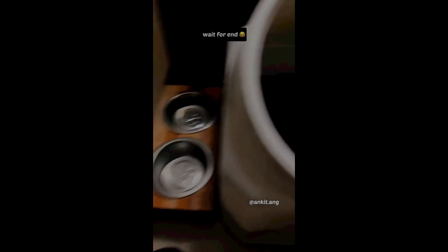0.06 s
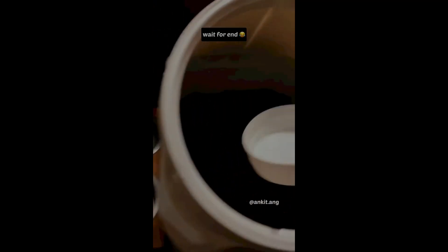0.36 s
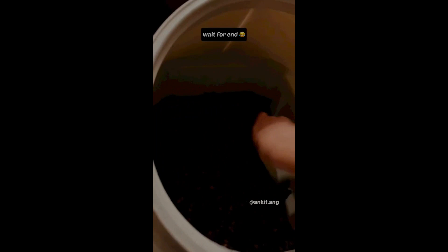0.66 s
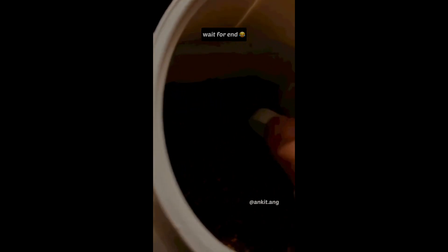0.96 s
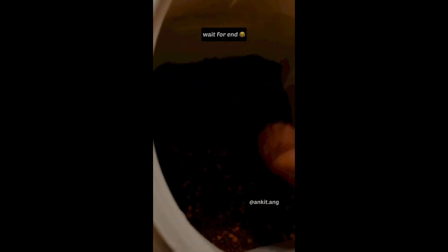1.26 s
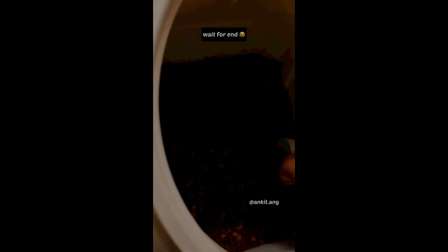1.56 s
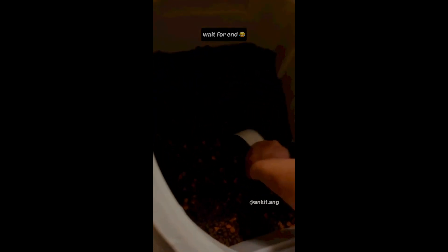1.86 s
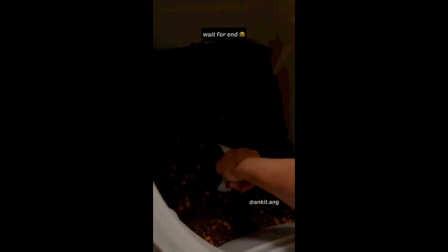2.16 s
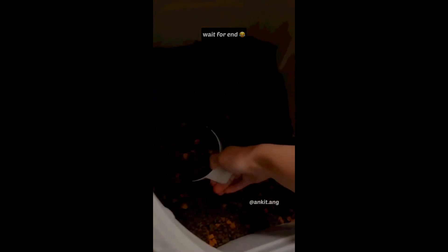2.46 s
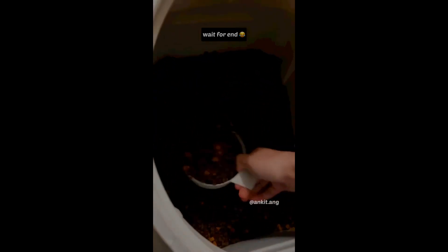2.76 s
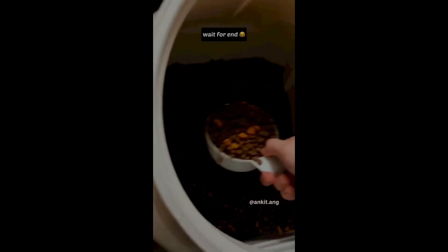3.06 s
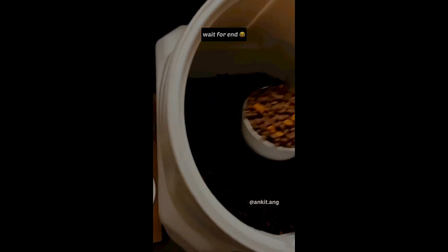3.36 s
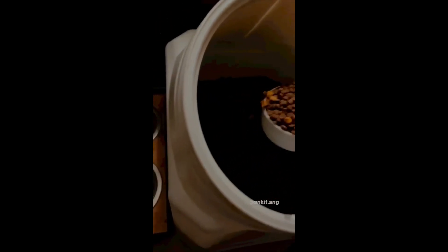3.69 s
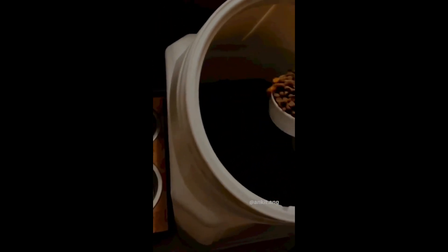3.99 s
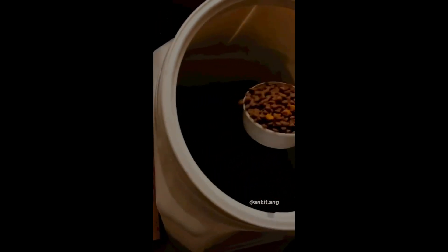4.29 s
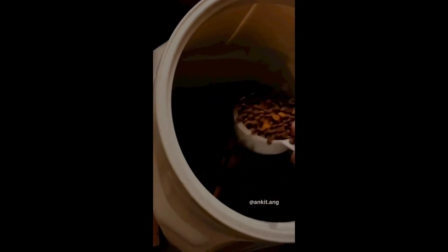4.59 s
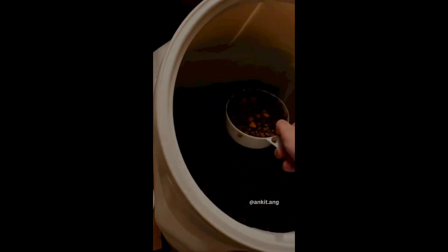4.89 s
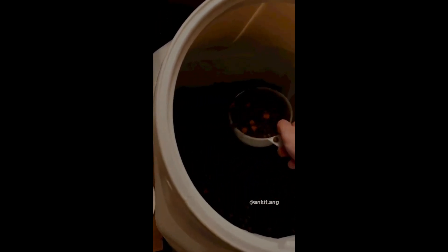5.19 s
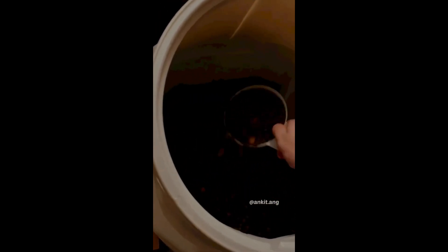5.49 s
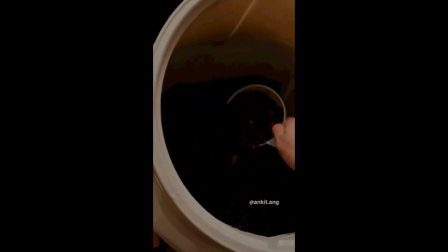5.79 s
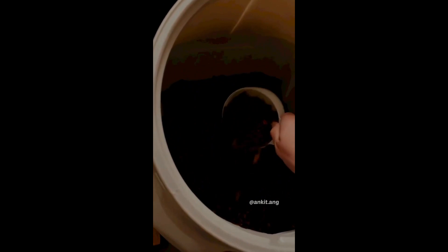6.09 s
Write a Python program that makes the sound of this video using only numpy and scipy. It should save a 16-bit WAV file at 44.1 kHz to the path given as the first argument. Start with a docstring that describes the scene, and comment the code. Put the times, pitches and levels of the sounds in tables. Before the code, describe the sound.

Close by in a quiet room, dry pet food pellets crackle and grind as a cup is shoved into a big plastic storage bin, which thumps and resonates hollowly. After about two seconds the digging eases into a few light ticks. The raised cup is then shaken, and pellets trickle back onto the heap in uneven bursts, with crisp clicks and a hollow patter on plastic.

```python
"""Scooping dry pet food

A plastic cup digs through dry pet food in a big plastic bin, then is lifted and shaken so that
pellets spill back. Thousands of tiny contacts give a crisp crackle (pellet on pellet) and a hollow
patter (pellet on plastic). The air in the bin colours and echoes them, and its walls boom as the
cup pushes through the heap."""
import sys
import numpy as np
from scipy import signal
from scipy.io import wavfile
from scipy.ndimage import uniform_filter1d

SR = 44100
rng = np.random.default_rng(int(sys.argv[2]) if len(sys.argv) > 2 else 0)


def wrap_up_sound(samples):
    """Save the sound to the file named by the first command line argument, as 16-bit audio."""
    columns = np.atleast_2d(samples).T
    # keep every value between -1 and 1, then stretch to whole-number steps
    tamed = np.clip(columns, -1, 1)
    steps = np.round(tamed * 32767).astype(np.int16)
    wavfile.write(sys.argv[1], SR, steps)


N = 270758
TIME = np.arange(N) / SR


def from_db(db):
    """Turns decibels into a gain to multiply by."""
    return 10 ** (np.asarray(db) / 20)


def unit(x):
    """Scales a sound to an average power of 1."""
    return x / np.sqrt(np.mean(x ** 2) + 1e-20)


def steady(x, seconds):
    """Evens out swells slower than the given time, keeping the fine grain."""
    power = abs(uniform_filter1d(x ** 2, max(int(seconds * SR), 8)))
    return x / np.sqrt(power + 1e-9)


def curves(table):
    """Joins a table's rows with straight lines: one curve for each column after the time."""
    times, *columns = np.transpose(table)
    return np.array([np.interp(TIME, times, column) for column in columns])


def gain_curves(table, onset_s=0.21):
    """Turns a table of dB levels into gains that fade in just before its first time."""
    fade_in = np.clip((TIME - table[0][0]) / onset_s + 1, 0, 1)
    return from_db(curves(table)) * fade_in


def add(mix, start, sound):
    """Adds a sound into the mix at a start time in seconds."""
    part = mix[..., max(round(start * SR), 0):][..., :sound.shape[-1]]
    part += sound[..., :part.shape[-1]]


def colour(x, spectrum, peaks=(), size=8192):
    """Filters a sound as if it rang through an object with this spectrum and these resonances."""
    hz = np.abs(np.fft.fftfreq(size, 1 / SR))
    points_hz, points_db = np.transpose(spectrum)
    db = np.interp(np.log(hz + 1), np.log(points_hz), points_db)
    octaves_outside = np.log2(np.maximum(hz / points_hz[-1], 1) * np.maximum(points_hz[0] / (hz + 5), 1))
    db -= 30 * octaves_outside
    db += sum(boost / (1 + (2 * (hz - centre) / width) ** 2) for centre, width, boost in peaks)
    log_gain = np.log(from_db(np.maximum(db, -90)))
    response = np.exp(np.conj(signal.hilbert(log_gain)))  # rings after a hit, never before it
    ring = np.fft.ifft(response).real[:size // 2]
    return signal.oaconvolve(x, ring / np.linalg.norm(ring))[:N]


def low_pass(x, hz):
    """Cuts steeply above the given frequency."""
    taps = signal.firwin(511, hz, window=("kaiser", 8), fs=SR)
    return signal.oaconvolve(x, taps[None], "same")


def bumps(per_s, spread_db):
    """Tiny kicks of uneven size at random times."""
    sizes = from_db(spread_db * np.minimum(rng.exponential(1, N), 4))
    return sizes * (rng.random(N) < per_s / SR)


def contacts(per_s, spread_db, ring_s, count=40000, size=200):
    """Pellets touch at random, some harder than others; each rings briefly at two pitches of its own."""
    when, chance, force, decay, *pitches = rng.random((count, 6)).T
    at = (when * N).astype(int)
    sounding = chance < (per_s * np.ones(N))[at] * N / SR / count
    strength = np.minimum(-np.log(1 - force), 4)
    gain = from_db((spread_db * np.ones(N))[at] * strength)[sounding, None]
    t = TIME[:size]
    ring = sum(np.cos(2 * np.pi * (pitch[sounding, None] * SR / 4) * t) for pitch in pitches)
    ring *= gain * np.exp(-t / (ring_s * (.5 + decay[sounding, None])))
    samples = at[sounding, None] + np.arange(size)
    return np.bincount(samples.ravel(), ring.ravel(), N + size)[:N]  # adds up all the rings


# The tone of the room. Each row: frequency in Hz, relative level in dB.
ROOM_SPECTRUM = [(25, -17), (70, 8.5), (150, -6), (300, -16), (1000, -29), (4000, -23.5), (9600, -35.5)]

def room_tone():
    """A faint, steady rumble and hiss lies behind everything."""
    return from_db(-50.5) * colour(rng.standard_normal(N), ROOM_SPECTRUM)


# Jolts of the cup against heap or bin. Each row: start in seconds, relative level in dB, pitch in Hz.
JOLTS = [(0.592, -13, 81.7), (0.765, -8, 126), (0.785, -6, 85), (0.924, -11, 79.4), (0.949, -12, 119),
         (1.36, -11, 104), (1.618, -5, 120), (1.755, -17, 113), (1.835, -11.5, 116.5), (2, -15.5, 148),
         (2.059, -10, 108), (2.158, -13, 91), (2.314, -18, 129), (2.488, -22, 77.4), (2.79, -22.5, 114),
         (2.877, -22.5, 130), (3.43, -26, 105), (3.693, -25.5, 121), (3.91, -22, 120), (4.049, -22, 112),
         (4.398, -23.5, 144), (4.611, -22, 126), (4.717, -21, 103), (5.038, -20, 126), (5.85, -17, 118)]

def thuds(rise_s=0.013, level_db=-4, overtone_ratio=2.56, overtone_db=-15):
    """Each jolt makes a wall of the bin swing: a low note with a shorter overtone."""
    out, t = np.zeros(N), TIME[:6000]
    swell = t / rise_s * np.exp(1 - t / rise_s)
    for start, db, hz in JOLTS:
        angle = 2 * np.pi * hz * t
        overtone = from_db(overtone_db) * swell ** 2 * np.sin(overtone_ratio * angle)
        add(out, start, from_db(db + level_db) * (swell * np.sin(angle) + overtone))
    return out


# Shoves that set the heap grinding: a bump, then the cup landing, digging and drawing out.
# Each row: start, rise and hold in seconds, the pellets' fade in dB per second,
# then relative levels in dB for crackle, patter, wall boom and air drone.
SHOVES = [(0.0, 0.0027, 0.0025, 346, -41.5, -44, -40, -38),
          (0.558, 0.036, 0.0078, 182, -24.5, -26, -20.5, -30),
          (0.651, 0.14, 0.16, 56, -15.5, -17, -15.5, -19.5), (1.252, 0.15, 0.21, 138, -15, -17, -20, -26.5),
          (1.641, 0.024, 0.18, 102, -34.5, -36.5, -19, -29), (1.935, 0.056, .115, 105, -24, -28, -16, -38),
          (2.127, 0.039, 0.069, 115, -24, -25, -26, -33.5), (2.34, 0.014, 0.14, 60, -32.5, -37, -33.5, -39)]

def shoves(wall_fade_share=0.64, air_fade_share=0.8):
    """Gains for crackle, patter, boom and drone as shoves build and fade; walls and air settle last."""
    power = np.zeros((4, N))
    share = np.array([[1], [1], [wall_fade_share], [air_fade_share]])
    t = TIME[:2 * SR]
    for start, rise, hold, fade, *db in SHOVES:
        faded_db = share * fade * np.maximum(t - rise - hold, 0)
        gain = np.minimum(t / rise, 1) * from_db(np.array(db)[:, None] - faded_db)
        add(power, start, gain ** 2)
    return np.sqrt(power)


# The tone of the walls (cup buried, cup raised) and of the air in the bin.
# Each row: frequency in Hz, relative level in dB.
BOOM_BURIED = [(20, -23.5), (42, -27), (62, -1), (80, 0.5), (98, -1), (120, 0.5), (150, -4.5), (185, -10.5),
               (260, -31), (500, -62)]
BOOM_RAISED = [(20, -46), (42, -25), (62, -5), (80, 3.5), (110, 3.5), (145, 4.5), (190, -16), (260, -20.5),
               (500, -30)]
AIR_DRONE = [(130, -19), (220, 2), (300, 1.5), (355, -2), (425, 4), (520, -8), (650, -9), (1000, -28.5)]
# Rumble while the cup is held up. Each row: time in seconds, relative boom and drone levels in dB.
HANDLING = [(2.55, -35.5, -44), (3.17, -42, -50), (3.31, -49, -64), (3.43, -34, -44.5),
            (3.85, -42.5, -52.5), (3.92, -31.5, -42.5), (4.34, -36, -43), (4.42, -30.5, -36.5),
            (4.98, -43, -48), (5.01, -37, -41.5), (6.12, -31.5, -34.5), (6.14, -34, -38)]

def bin_rumble(lift, push, boom_db=0.5, drone_db=-1.5, jolt_db=-19, jolt_s=0.0081):
    """Shoves and handling make the bin's walls boom and its air drone; jolts stir the air too."""
    handling = gain_curves(HANDLING) * from_db([[boom_db], [drone_db]])
    boom_gain, drone_gain = np.hypot(push, handling)  # hypot adds two levels by their power
    jolts, t = np.zeros(N), TIME[:SR // 4]
    for start, db, _ in JOLTS:
        add(jolts, start, from_db(db + jolt_db) * t / jolt_s * np.exp(1 - t / jolt_s))
    wall_kicks = bumps(300, spread_db=0.5) * rng.standard_normal(N)
    boom = colour(wall_kicks * (1 - lift), BOOM_BURIED) + colour(wall_kicks * lift, BOOM_RAISED)
    air_kicks = bumps(600, spread_db=0.5) * rng.standard_normal(N)
    drone = steady(colour(air_kicks, AIR_DRONE), seconds=0.056)
    return boom_gain * steady(boom, seconds=.05) + np.hypot(drone_gain, jolts) * drone


# Scrapes and squeaks on the plastic, two short knocks, and a faint opening rustle.
# Each row: start and length in seconds, pitch and resonance width in Hz, level in dB.
SCRAPES_AND_KNOCKS = [(0.204, 0.23, 2700, 1500, -64), (0.909, .055, 427, 40, -20),
                      (1.07, 0.31, 2450, 348, -47), (1.183, 0.0087, 1410, 710, -20.5),
                      (1.288, 0.019, 6200, 810, -26), (1.676, 0.16, 856, 129, -34),
                      (1.941, 0.17, 5640, 990, -30), (1.967, 0.07, 884, 180, -31.5),
                      (2.861, 0.0092, 5580, 220, -37), (2.955, 0.0079, 5600, 251, -40),
                      (3.18, 0.043, 6800, 1500, -44), (3.359, 0.02, 600, 900, -44),
                      (4.9, 0.016, 6700, 496, -27.5), (5.153, 0.022, 6360, 503, -28)]

def scrapes_and_knocks():
    """Each scrape, squeak, knock or rustle is a swell of noise ringing through one resonance."""
    out = np.zeros(N)
    for start, length, hz, width, db in SCRAPES_AND_KNOCKS:
        n = int(length * SR)
        pole = np.exp((2j * hz - width) * np.pi / SR)  # sets the pitch and how long it rings
        noise = rng.standard_normal(SR // 2)
        ring = signal.lfilter([1], np.poly([pole, pole]), noise)[-n:].real
        add(out, start, from_db(db) * unit(ring * signal.windows.tukey(n, .6)))
    return out


# The tone of the cup hitting the heap. Each row: frequency in Hz, relative level in dB.
STRIKE_SPECTRUM = [(300, -29), (850, -4), (1200, -21), (2500, -3), (3080, -21), (3700, 0), (4400, 0),
                   (4800, -5), (6000, 4), (6450, -5), (7100, 0), (8200, -8), (9600, -14)]

def cup_strike(crash_db=-14, tail_db=-15, tail_s=0.02, ring_db=-28, ring_hz=6020, ring_s=.14):
    """The cup's rim hits the heap: a packed burst of contacts, a short settling, and a faint ring."""
    start, rise_s, length_s, fall_s = .5702, .002, .0165, .002
    t = np.maximum(TIME - start, 0)
    after = np.maximum(t - length_s, 0)
    settling = np.maximum(np.exp(-after / fall_s), from_db(tail_db) * np.exp(-after / tail_s))
    shape = np.minimum(t / rise_s, 1) * settling
    grains = steady(contacts(6800, spread_db=4.0, ring_s=0.00046), seconds=0.0025)
    ring = from_db(ring_db - 60 * t / ring_s) * np.sin(2 * np.pi * ring_hz * t)
    return from_db(crash_db) * colour(grains * shape, STRIKE_SPECTRUM) + ring


# Single pellets that snap or drop.
# Each row: start in seconds, relative crackle and patter levels in dB, pitch in Hz.
SNAPS = [(0.009, -34, -32.5, 1200), (1.183, -15, -20, 1500), (2.346, -17, -26, 1530),
         (2.463, -26, -35, 5870), (2.474, -31, -27, 6600), (2.498, -26, -31, 4260),
         (2.545, -21.5, -32, 4470), (2.595, -23.5, -32, 5460), (2.719, -32.5, -40, 6470),
         (2.768, -31, -37, 5740), (2.775, -29.5, -40, 8400), (2.873, -35, -43, 5500),
         (2.91, -36, -45, 6100), (3.095, -30.5, -40, 7760), (3.168, -28, -32.5, 6000),
         (3.206, -30, -34, 6200), (3.223, -25, -37, 2200), (3.255, -21, -23, 6260),
         (3.305, -33, -34.5, 3100), (3.361, -27.5, -35, 8400), (3.401, -36, -61, 6100),
         (3.461, -32, -53, 8800), (3.657, -27.5, -33, 3780), (3.687, -28, -38, 5600),
         (3.717, -33, -32, 5900), (3.783, -27, -26, 6100), (3.843, -35, -43, 3300), (3.902, -26, -50, 7150),
         (3.943, -31, -54, 8350), (4.168, -16, -23, 6200), (4.222, -16.5, -19.5, 6350),
         (4.234, -14, -22, 3980), (4.395, -18.5, -25, 6060), (4.579, -19, -28, 7950),
         (4.688, -21, -30, 4500), (4.821, -23, -28, 4420), (5.004, -23, -42, 6000),
         (5.029, -19.5, -27, 6060), (5.145, -25, -24.5, 6200), (5.473, -30, -25, 2400),
         (5.852, -25, -22, 1790), (6.021, -19, -8.5, 1090)]

def snaps(rise_s=0.0013, fall_s=0.0018, level_db=5, tone_db=-3, width_hz=1100):
    """One pellet snaps and chatters for a moment against its neighbours, ringing at its own pitch."""
    out, t = np.zeros((2, N)), TIME[:900]
    shape = (1 - np.exp(-(t / rise_s) ** 2)) * np.exp(-np.maximum(t - rise_s, 0) / fall_s)
    for start, crackle_db, patter_db, hz in SNAPS:
        chatter = rng.standard_normal(len(t))
        pole = np.exp((2j * hz - width_hz) * np.pi / SR)
        ring = .5 * unit(signal.lfilter([1], [1, -pole], chatter).real)
        snap = steady(chatter + from_db(tone_db) * ring, seconds=0.0045)
        gains = from_db(np.array([[crackle_db], [patter_db]]) + level_db)
        add(out, start, gains * shape * snap)
    return out


# Clumps of pellets that slide or land together.
# Each row: start and length in seconds, relative crackle and patter levels in dB.
CLUMPS = [(0.243, 0.033, -48, -57), (0.466, 0.012, -44, -48), (0.691, 0.025, -24.5, -24),
          (0.897, 0.022, -14.5, -21), (1.118, 0.029, -31, -29), (1.368, 0.044, -15.5, -37),
          (2.376, .02, -29.5, -34), (2.633, 0.022, -41, -48), (2.794, 0.022, -44, -52),
          (2.972, 0.014, -44, -75), (3.215, 0.034, -36.5, -38), (3.533, 0.075, -32, -36.5),
          (3.729, 0.035, -37, -40), (3.894, 0.0091, -34, -61), (4.18, 0.044, -25, -32.5),
          (4.368, 0.032, -26.5, -35), (4.515, 0.048, -29.5, -36), (4.678, .025, -33, -42),
          (4.812, 0.065, -26.5, -34.5), (4.893, 0.039, -31.5, -44), (4.993, 0.04, -23.5, -33),
          (5.137, 0.046, -26.5, -38), (5.272, 0.094, -28.5, -31), (5.408, 0.047, -30.5, -25),
          (5.519, 0.043, -25.5, -23.5), (5.577, 0.077, -29.5, -22), (5.647, 0.026, -28, -15.5),
          (5.771, 0.033, -27, -15.5), (5.904, 0.018, -39, -17), (5.996, 0.074, -23, -19.5)]

def clumps(rise_s=0.0027, fall_s=0.01, level_db=-3):
    """A push or shake of the cup lets a tight shower of pellets go."""
    gains = np.zeros((2, N))
    for start, length, *db in CLUMPS:
        t = TIME[:int((length + .04) * SR)]
        shape = np.minimum(t / rise_s, 1) * np.exp(-np.maximum(t - length, 0) / fall_s)
        add(gains, start, from_db(np.add(db, level_db))[:, None] * shape)
    return gains * steady(contacts(2400, spread_db=1.0, ring_s=0.00083), seconds=0.027)


# Pellets trickling over the rim as the cup is lifted and tipped.
# Each row: time in seconds, relative crackle and patter levels in dB.
TRICKLE = [(2.65, -45, -57), (2.84, -62.5, -82), (2.99, -52.5, -53.5), (3.27, -57, -48.5),
           (3.53, -44, -54.5), (3.67, -49, -49), (4.03, -37.5, -44), (4.32, -27.5, -36.5),
           (4.43, -29.5, -33.5), (4.6, -37.5, -42.5), (4.76, -34, -43), (4.93, -34.5, -39),
           (5.26, -36, -35.5), (5.52, -28.5, -28), (5.71, -27.5, -28.5), (5.89, -25.5, -24),
           (6.04, -33, -32.5), (6.14, -23.5, -19.5)]

def trickle(dip_db=-7, jam_s=0.016):
    """The strength of the trickle; it falters just before each clump, while pellets wedge at the rim."""
    stuck = np.zeros(N)
    jam = signal.windows.tukey(int(jam_s * SR), .5)
    for start, *_ in CLUMPS:
        add(stuck, start - jam_s, jam)
    return gain_curves(TRICKLE) * from_db(dip_db * stuck)


def strays(flow, per_s=45, level_db=-1, rise_s=0.0013):
    """Lone pellets click out of the trickle at random."""
    t = TIME[:400]
    shape = t / rise_s * np.exp(1 - t / rise_s)
    clicks = signal.oaconvolve(bumps(per_s, spread_db=1.0), shape)[:N]
    return flow * from_db(level_db) * clicks * rng.standard_normal(N)


def stream(lift, grind, flow, dig_per_s=3600, spill_per_s=1900, grind_db=-3):
    """The heap grinds densely round the buried cup; loose pellets fall more sparsely."""
    per_s = dig_per_s + lift * (spill_per_s - dig_per_s)
    grains = steady(contacts(per_s, spread_db=3.5 + 0.16 * lift, ring_s=0.00054), seconds=.025)
    spill = flow * from_db([[-2.5], [-1.5]])  # crackle, patter
    return grains * np.hypot(from_db(grind_db) * grind, spill)


# The tone of crackle and patter with the cup buried, and with it raised and spilling.
# Each row: frequency in Hz, relative level in dB.
CRACKLE_BURIED = [(1800, -18.5), (3000, -8), (4200, -2), (4800, -5.5), (5600, -4), (7200, -8), (8400, -11),
                  (9600, -15.5)]
PATTER_BURIED = [(400, -5), (620, -5), (850, 0), (1050, -1.5), (1500, -0.5), (2400, -3), (3100, -9.5),
                 (4500, -12.5)]
CRACKLE_RAISED = [(1800, -33.5), (3000, -8), (4350, -1.5), (4780, -3.5), (5200, 1.5), (6300, 0.5),
                  (7400, -0.5), (8500, -3.5), (9600, -8)]
PATTER_RAISED = [(400, -25), (720, -17.5), (860, -5.5), (1020, -4), (1200, 0.5), (1400, -2), (1600, 2.5),
                 (1950, -1.5), (2450, 3), (3100, -4.5), (4500, -12)]
# Peaks and dips from the cup and the air in the bin. Each row: centre and width in Hz, boost in dB.
RESONANCES = [(842, 50, 3.5), (1181, 61, 5), (1600, 45, -1), (1920, 23, 3), (2260, 50, 4), (2434, 53, 0),
              (3850, 43, 4.5), (4220, 60, 4), (4500, 70, 8.5), (4615, 156, -6.5), (5500, 25, 5),
              (6100, 90, 3), (7200, 60, 5)]

def bin_colour(pellets, lift):
    """Crackle and patter sound through the heap or the open bin, depending on the cup's height."""
    crackle, patter = pellets
    buried = colour(crackle, CRACKLE_BURIED, RESONANCES) + colour(patter, PATTER_BURIED, RESONANCES)
    raised = colour(crackle, CRACKLE_RAISED, RESONANCES) + colour(patter, PATTER_RAISED, RESONANCES)
    return from_db(-0.5) * (1 - lift) * buried + from_db(-0.96) * lift * raised


def echoes(x, fade_s, wet_db, places=7, echoes_per_s=3000):
    """Dense, dying echoes; their pattern changes as the contacts move from place to place."""
    t = TIME[:SR // 3]
    place = np.repeat(rng.integers(0, places, N // 400 + 1), 400)[:N]  # picked anew every 9 ms
    tail = np.zeros(N)
    for k in range(places):
        signs = rng.choice([-1, 1], len(t))
        arrivals = (rng.random(len(t)) < echoes_per_s / SR) * (t > .0015)
        taps = signs * arrivals * from_db(-60 * t / fade_s)
        share = np.sqrt(abs(uniform_filter1d((place == k) * 1., size=128)))
        tail += signal.oaconvolve(x * share, taps / np.linalg.norm(taps))[:N]
    wet = from_db(wet_db)
    return (x + wet * tail) / np.sqrt(1 + wet ** 2)


# The cup rising. Each row: time in seconds, height from 0 (buried) to 1 (above the heap).
CUP_HEIGHT = [(2.25, 0.0083), (2.9, 1)]

def scene():
    """The stream fills the bin with echoes; snaps and clumps at the cup are heard more directly."""
    lift = np.clip(curves(CUP_HEIGHT)[0], 0, 1)
    grind, push = np.split(shoves(), 2)  # crackle and patter gains; boom and drone gains
    flow = trickle()
    deep = echoes(bin_colour(stream(lift, grind, flow), lift), fade_s=0.1, wet_db=2)
    at_cup = bin_colour(clumps() + snaps() + strays(flow), lift) + cup_strike()
    near = echoes(at_cup, fade_s=0.04, wet_db=-8)
    scooping = echoes(deep + near + scrapes_and_knocks(), fade_s=.25, wet_db=-21, places=2)
    return (room_tone() + thuds() + bin_rumble(lift, push) + scooping)[None]


def record(dry, ceiling=.85, treble_hz=9680, treble_db=-27, cutoff_hz=10864):
    """Rounds off the loudest peaks, turns the high treble down and cuts away the very top."""
    rounded = dry / (1 + (dry / ceiling) ** 6) ** (1 / 6)
    treble_gain = from_db(treble_db)
    softened = (1 - treble_gain) * low_pass(rounded, treble_hz) + treble_gain * rounded
    return low_pass(softened, cutoff_hz)


dry = scene()
out = record(dry)
wrap_up_sound(out)
```